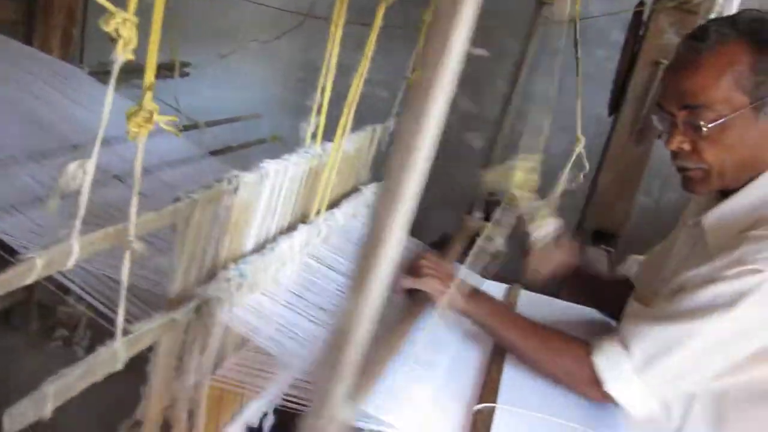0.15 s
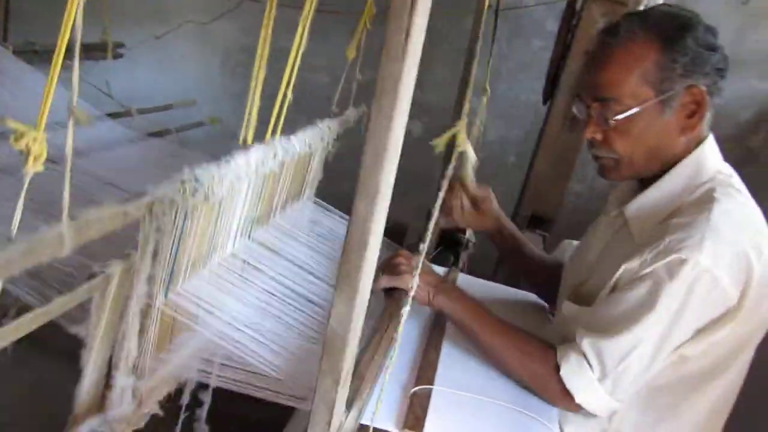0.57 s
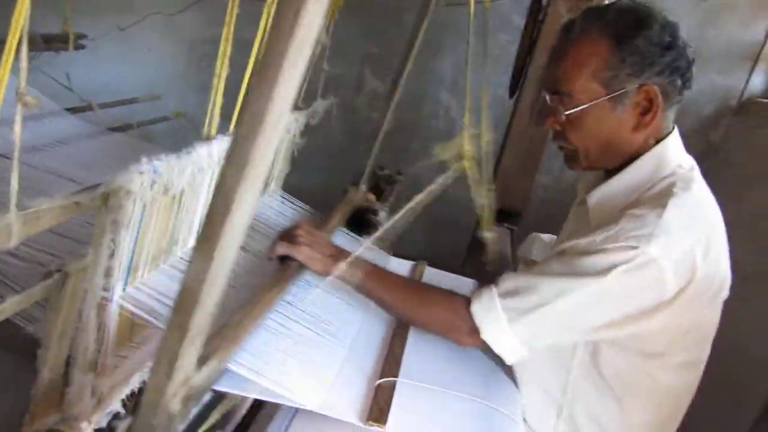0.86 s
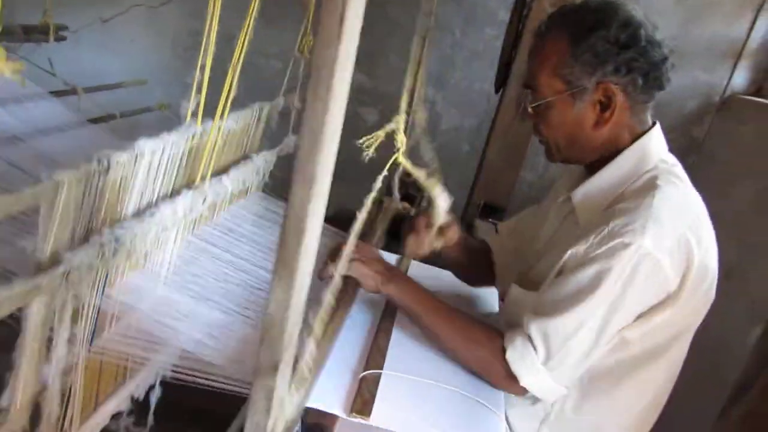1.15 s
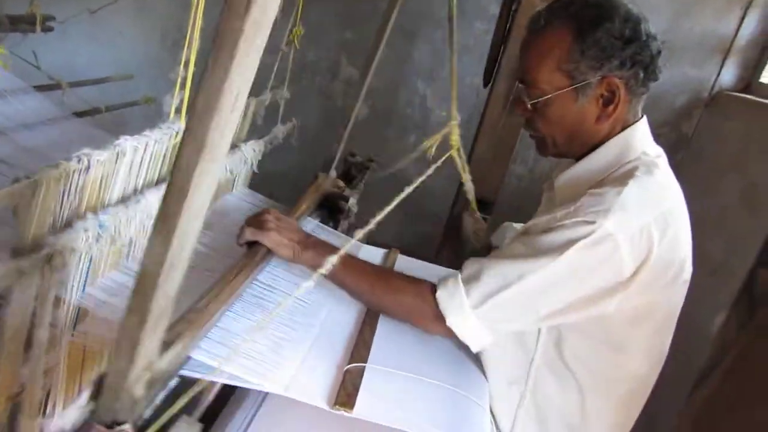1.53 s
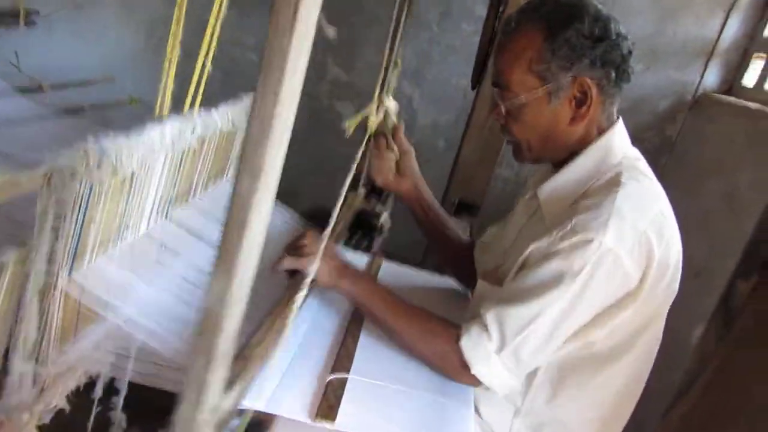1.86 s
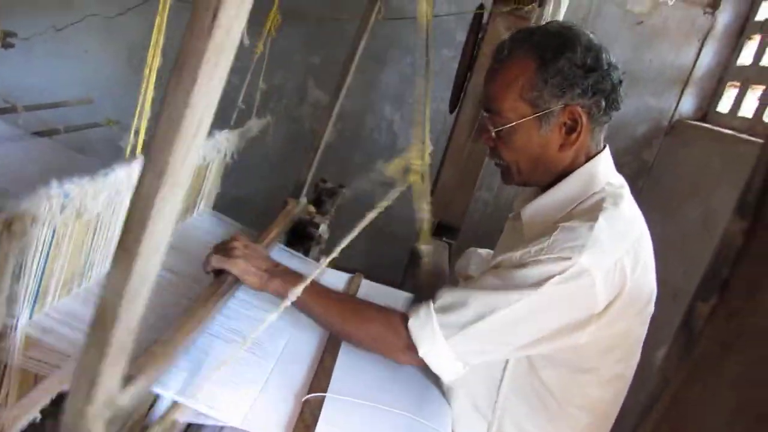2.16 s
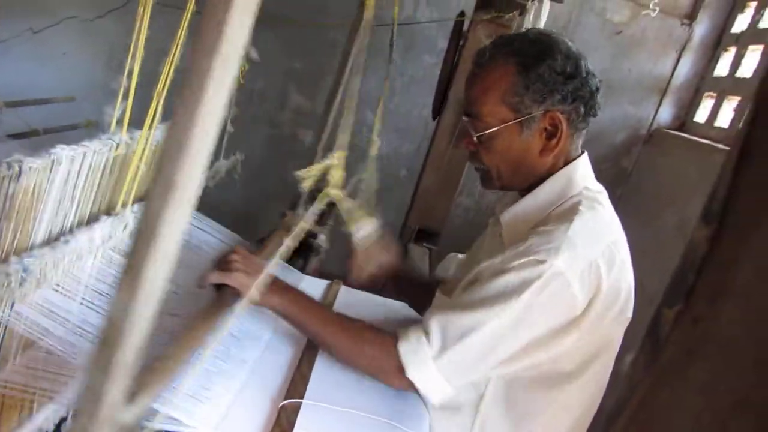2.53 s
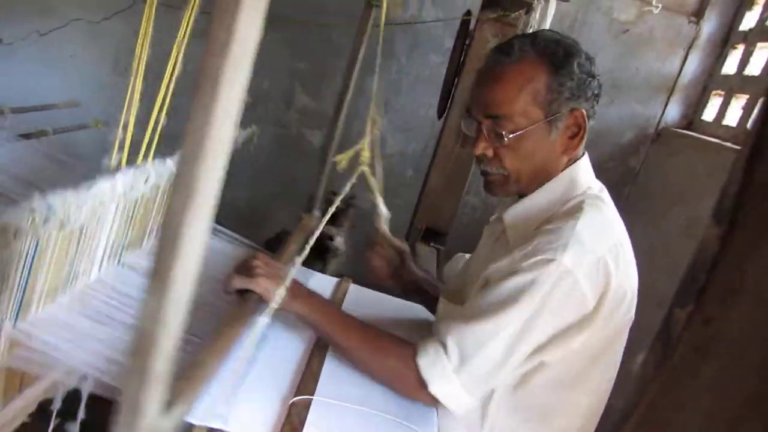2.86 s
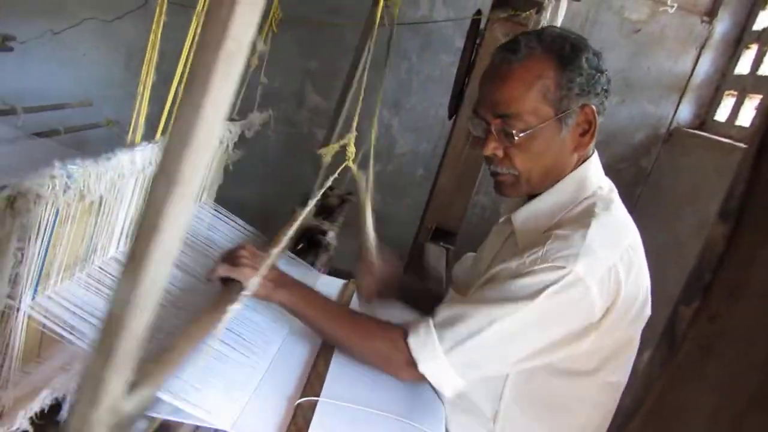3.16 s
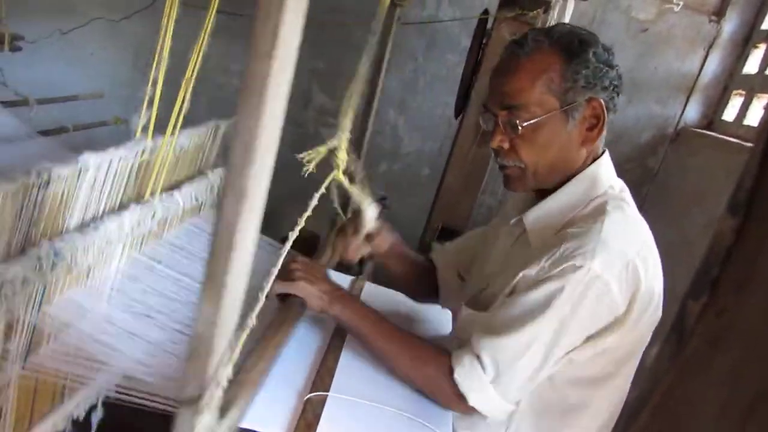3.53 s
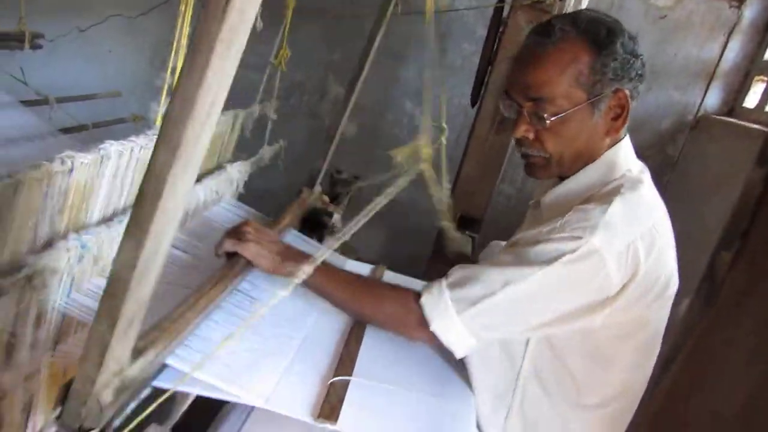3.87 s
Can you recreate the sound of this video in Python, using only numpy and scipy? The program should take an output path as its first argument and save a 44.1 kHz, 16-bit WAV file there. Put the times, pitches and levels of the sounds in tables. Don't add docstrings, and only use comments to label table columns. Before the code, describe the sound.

A wooden handloom about a metre away repeats a 1.2-second cycle: heavy beater slam, bright picker crack, rattling shafts and treadles, then a hollow shuttle knock, in a bare, reverberant workshop with faint fan hum.

```python
import sys
import numpy as np
from scipy import signal
from scipy.fft import rfft, irfft
from scipy.io import wavfile
from scipy.ndimage import uniform_filter1d

SR = 44100
rng = np.random.default_rng(int(sys.argv[2]) if len(sys.argv) > 2 else 0)


def volts(x):
    e = np.asarray(x, float) / 20
    return 10 ** e


def wav_out(sig):
    wavfile.write(sys.argv[1], SR, np.round(np.clip(np.atleast_2d(sig).T, -1, 1) * 32767).astype(np.int16))


N = 176400
LEAD_SAMPLES = 13230
SIZE = 24576

# start in seconds, peak level in dB, tilt in dB per octave, rattle in dB, beam in dB.
BEATER_BLOWS = [
    (0.233, -2, -2.44, -5.5),
    (1.418, -3, -2.6, -5),
    (2.613, -2.5, -2.4, -7),
    (3.798, -4, -1.5, 2),
]
PICKER_BLOWS = [
    (0.403, -4.5, 0, 0.0038, 2),
    (1.586, -2, 0.74, 0, -2),
    (2.785, -2.5, 0.95, 0, -2.5),
    (3.967, 0.5, 0.81, 0, -2),
]
SHUTTLE_LANDINGS = [
    (1.022, -1, 0.85, 0, -4.5),
    (2.214, -2, 0.36, 0, -4),
    (3.399, -3, 0, 0, 0),
]
EARLIER_LANDING = [
    (-0.12, -4, 0.026, 0.018),
]
# start in seconds, peak level in dB, tilt in dB per octave.
SHAFT_KNOCKS = [(0.77, -29, 2), (0.79, -16.5, -3.5), (0.794, -20.5, -3.5), (0.811, -14.5, 1),
                (0.816, -9, -1), (0.824, -16.5, 5), (0.843, -14.5, 6), (0.857, -12, -4.5),
                (0.865, -6, -0.5), (0.877, -16.5, -9), (0.905, -13, 5), (1.954, -24, 3.5),
                (1.978, -11.5, -2), (1.997, -13, 2), (2.003, -7.5, -1), (2.008, -13.5, 4.5),
                (2.016, -16.5, 6.5), (2.02, -17, 0), (2.045, -11, 1), (2.051, -7, 0), (2.064, -12, -3),
                (2.078, -16, -3), (2.089, -11, 8), (2.097, -13, 4), (3.148, -22.5, 0.5), (3.168, -13.5, -2),
                (3.189, -10.5, 0), (3.194, -8, 1), (3.201, -8.5, 3.5), (3.234, -11, 2), (3.243, -6, -1.5),
                (3.251, -16, -9), (3.279, -13, 6)]
# start in seconds, peak level in dB, tilt in dB per octave.
CORD_TICKS = [(0.0179, -28, 4.5), (0.1037, -24, 1.5), (0.109, -19, 1), (0.115, -34, -4), (0.1446, -48, 2),
              (0.1795, -38, 7), (0.3077, -28.5, 2.1), (0.6024, -27, -0.2), (1.19, -35, -7),
              (1.2012, -26.5, -0.5), (1.227, -27.5, -3.5), (1.257, -32, -4), (1.2645, -30.5, 0),
              (1.314, -44, 8), (2.3955, -26, -1.3), (2.4599, -26.5, -3), (2.5134, -32.5, 0.61),
              (2.55, -39, -9), (2.989, -31, 0.5), (3.5349, -22, -2), (3.5555, -24, -2), (3.5813, -27, -0.5),
              (3.6638, -20.5, 1.5), (3.6778, -30, -2), (3.742, -35, 5)]
# start in seconds, length in seconds, level in dB, tilt in dB per octave.
SCRAPES = [
    (0.811, 0.057, -33, 1),
    (0.893, 0.036, -36, 2.5),
    (1.994, 0.061, -28.5, 0),
    (2.08, 0.03, -29.5, 1.5),
    (3.19, 0.068, -30.5, -1.5),
    (3.268, 0.0284, -28, 1.5),
]
# start in seconds, peak level in dB, pitch in Hz.
FRAME_THUDS = [
    (0.238, -30, 194),
    (1.028, -40, 151),
    (1.409, -36, 208),
    (2.07, -23.5, 150.4),
    (2.148, -38, 148),
    (2.219, -46, 215),
    (2.62, -29, 196),
    (2.881, -28, 142),
    (3.2, -44, 248),
    (3.792, -30, 208),
]
# start in seconds, length in seconds, level in dB.
CORD_SQUEALS = [
    (.945, .08, -62),
    (3.31, .075, -62),
]

# delay in seconds, level in dB, decay in seconds.
BEATER_CONTACTS = [(-.013, -26, .003), (-.005, -18, .003), (-.002, -8, .0015), (0, -1, .0012),
                   (.002, -1, .0012), (.0058, 1, .0012), (.009, -11, .004)]
PICKER_CONTACTS = [(-.001, -4, .002), (.0015, 0, .0015), (.005, -3, .002), (.009, -8, .008)]
SHUTTLE_CONTACTS = [(-.0018, -7, .001), (.0008, 0, .001), (.003, -7, .003), (.007, -13, .006)]
SHAFT_CONTACTS = [(0, 0, .0008), (.002, -11, .003)]
TICK_CONTACTS = [(0, -3, .002), (.003, 0, .004)]

# frequency in Hz, width in Hz, level in dB.
BEATER_MODES_HZ_DB = [(840, 53, -1), (1660, 220, -20.5), (2150, 67, -17.5), (3060, 220, 5),
                      (5900, 660, -6.5)]
PICKER_MODES_HZ_DB = [(1227, 24, 9), (1817, 160, 3.5), (2940, 40, 3.5), (3440, 320, 0.5), (5320, 150, -4.5)]
SHUTTLE_MODES_HZ_DB = [(830, 160, -2), (1220, 23, -11.5), (1950, 480, -8), (2680, 180, -6),
                       (4630, 140, -23)]
SHAFT_MODES_HZ_DB = [(1050, 580, -9), (1700, 30, -12), (2010, 65, -11), (2685, 600, -13.5), (5130, 85, -35)]
# frequency in Hz, level in dB, T60 in seconds.
BEAM_PARTIALS = [(1225, -32, .7), (1850, -35, .45), (585, -43, .5)]

# frequency in Hz, level in dB.
BEATER_COLOUR_DB = [(60, -29), (200, -9.5), (1000, -6.5), (2810, 3.5), (4680, 3), (9210, -0.5),
                    (12000, -17.5), (16000, -6)]
PICKER_COLOUR_DB = [(47, -90), (100, -48), (700, -20.5), (1400, -4.5), (1900, -8.5), (2430, -5),
                    (5900, -2.5), (10000, -13), (16000, -30.5)]
SHUTTLE_COLOUR_DB = [(60, -16), (200, -20), (515, -16), (1170, -5.5), (2720, 3), (4050, -4.5), (7700, -6.5),
                     (12000, -24.5), (16000, -29)]
SHAFT_COLOUR_DB = [(47, -84), (100, -28), (361, -19), (700, -9), (1170, -6), (3170, -4.5), (4620, -9.5),
                   (6500, -9.5), (11000, -29.5), (16000, -46)]
TICK_COLOUR_DB = [(120, -66), (200, -25.5), (709, -3.5), (1400, -17), (2330, -5), (3760, -12),
                  (7540, -12.5), (16000, -58.5)]
RATTLE_COLOUR_DB = [(88, -32), (150, -22), (264, -17), (1240, -4), (2800, -9), (6260, -17), (11000, -40.5),
                    (16000, -47)]

# frequency in Hz, T60 in seconds.
ROOM_T60_S = [(300, 1), (1500, 0.73), (4000, 0.54), (9000, 0.43), (16000, 0.14)]
# frequency in Hz, correlation.
ROOM_CORRELATION = [(60, 0.45), (200, 0.99), (1000, 0.83), (3000, 0.17), (8000, 0.033)]
# frequency in Hz, level in dB.
MURMUR_COLOUR_DB = [(26, -36), (45, -10), (183, -4), (271, -3.5), (1210, -5.5), (3490, -16), (3750, -20),
                    (4040, -23), (16000, -45)]
# time in seconds, level in dB.
HUM_LEVEL_DB = [(0.0, -57.5), (0.18, -55), (4.0, -57)]
# frequency in Hz, left minus right in dB.
PORT_DIFFERENCE_DB = [(200, -1), (700, .2), (3000, -1), (9000, 2), (13000, 0)]


def on_log(table, hz):
    points = np.array(table, float)
    return np.interp(np.log(hz + 1), np.log(points[:, 0] + 1), points[:, 1])


def causal(db):
    c = irfft(db * np.log(10) / 20)
    n = len(c) // 2
    return np.exp(rfft(np.r_[c[0], 2 * c[1:n], c[n], np.zeros(n - 1)]))


def walk(rate_hz, n):
    k = int(SR / rate_hz)
    v = np.repeat(rng.standard_normal(n // k + 1), k)
    v = uniform_filter1d(uniform_filter1d(v, k), k)[:n]
    return v / v.std()


def tone(hz):
    return np.sin(2 * np.pi * np.cumsum(hz) / SR)


def add(out, start_s, x):
    i = int(start_s * SR) + LEAD_SAMPLES
    n = min(x.shape[1], out.shape[1] - i)
    out[:, i:i + n] += x[:, :n]


def grit(spread_db):
    own_share = 0.23
    common, *own = rng.standard_normal((3, SIZE))
    v = np.sqrt(1 - own_share) * common + np.sqrt(own_share) * np.array(own)
    v = v * volts(spread_db * np.minimum(rng.exponential(size=SIZE), 7))
    return v / np.sqrt(np.mean(v ** 2))


def body(push, colour, tilt_db, modes, ring_db, widen):
    lag_spread_s = 3e-5
    hz = np.fft.rfftfreq(SIZE, 1 / SR)
    ring = 0
    for mode_hz, width_hz, db in modes:
        level_shift_db, pitch_shift = rng.standard_normal(2)
        mode_hz = mode_hz * (1 + 0.032 * pitch_shift)
        ring = ring + volts(ring_db + db + level_shift_db) / (1 + 2j * (hz - mode_hz) / (width_hz * widen))
    lag_s = lag_spread_s * rng.standard_normal() * np.array([[1], [-1]])
    place = np.exp(1j * np.pi * hz * lag_s)
    broad = causal(on_log(colour, hz) + tilt_db * np.log2((hz + 50) / 2000))
    return irfft(rfft(push) * place * broad * (1 + ring))


def contact_push(contacts, t, knock_hz):
    env = sum(volts(db) * (t >= d) * np.exp(-np.abs(t - d) / decay_s) for d, db, decay_s in contacts)
    touch = np.clip(np.diff(env, prepend=0), 0, None) * np.sign(walk(900, SIZE))
    knock_t = np.arange(256) / SR
    pitch_hz = knock_hz * volts(rng.standard_normal())
    knock = np.exp(-knock_t / 0.0007) * np.sin(2 * np.pi * pitch_hz * knock_t)
    return 1.39 * env * grit(1.44) + volts(6) * np.convolve(touch, knock)[:SIZE]


def loose_parts(t, tilt_db, rattle_db, t60_s):
    env = volts(rattle_db - 60 * np.abs(t) / t60_s + 2.47 * walk(151.2, SIZE)) * np.clip(t / 0.0018, 0, 1)
    x = body(grit(3.0), RATTLE_COLOUR_DB, .5 * tilt_db, SHAFT_MODES_HZ_DB, 0.17, 2.7)
    return env * x / x.std()


def frame_beam(t, beam_db):
    out = 0
    for hz, db, t60_s in BEAM_PARTIALS:
        env = volts(db + beam_db + 3.5 * walk(34.3, SIZE) - 60 * t / t60_s)
        hz = hz * (1 + .015 * rng.standard_normal())
        out = out + env * np.sin(2 * np.pi * hz * t + 6 * rng.random())
    return out * np.clip(t / 0.004, 0, 1)


def blows(rows, contacts, colour, modes, ring_db, rattle_db, rattle_t60_s, beam_db, knock_hz):
    before_s = .02
    out, t = np.zeros((2, N + LEAD_SAMPLES)), np.arange(SIZE) / SR - before_s
    for start_s, db, tilt_db, *extra_db in rows:
        loose_db, sing_db = (*extra_db, 0, 0)[:2]
        hit = body(contact_push(contacts, t, knock_hz), colour, tilt_db, modes, ring_db, 1.4)
        x = hit / np.abs(hit).max() + loose_parts(t, tilt_db, rattle_db + loose_db, rattle_t60_s)
        if beam_db is not None:
            x = x + frame_beam(t, beam_db + sing_db)
        add(out, start_s - before_s, volts(db) * x)
    return out


def beater():
    return blows(BEATER_BLOWS, BEATER_CONTACTS, BEATER_COLOUR_DB, BEATER_MODES_HZ_DB, ring_db=2.7,
                 rattle_db=-18.5, rattle_t60_s=0.21, beam_db=-16, knock_hz=1700)


def picker():
    return blows(PICKER_BLOWS, PICKER_CONTACTS, PICKER_COLOUR_DB, PICKER_MODES_HZ_DB, ring_db=8.9,
                 rattle_db=-19.5, rattle_t60_s=0.51, beam_db=0.19, knock_hz=2110)


def shuttle():
    return blows([*EARLIER_LANDING, *SHUTTLE_LANDINGS], SHUTTLE_CONTACTS, SHUTTLE_COLOUR_DB,
                 SHUTTLE_MODES_HZ_DB, ring_db=5.1,
                 rattle_db=-28.5, rattle_t60_s=0.74, beam_db=0.25, knock_hz=1350)


def shafts():
    return blows(SHAFT_KNOCKS, SHAFT_CONTACTS, SHAFT_COLOUR_DB, SHAFT_MODES_HZ_DB, ring_db=10.5,
                 rattle_db=-14.0, rattle_t60_s=0.19, beam_db=-7, knock_hz=1280)


def ticks():
    return blows(CORD_TICKS, TICK_CONTACTS, TICK_COLOUR_DB, SHAFT_MODES_HZ_DB, ring_db=8.6,
                 rattle_db=-13.5, rattle_t60_s=0.12, beam_db=None, knock_hz=1540)


def slides():
    clicks_per_s, clicks_db = 450, 12
    out, t = np.zeros((2, N + LEAD_SAMPLES)), np.arange(SIZE) / SR
    knock_t = np.arange(128) / SR
    knock = np.exp(-knock_t / .0007) * np.sin(2 * np.pi * 1700 * knock_t)
    for start_s, length_s, db, tilt_db in SCRAPES:
        fade_db = -60 * np.clip(t - length_s, 0, None) / 0.25
        env = np.clip(t / 0.0032, 0, 1) * volts(fade_db + walk(178, SIZE))
        clicks = (rng.random(SIZE) < clicks_per_s / SR) * rng.standard_normal(SIZE)
        clicks = volts(clicks_db) * np.convolve(clicks, knock)[:SIZE]
        x = body(env * (grit(3.5) + clicks), SHAFT_COLOUR_DB, tilt_db, SHAFT_MODES_HZ_DB, 1.1, 0.3)
        add(out, start_s, volts(db) * x / np.sqrt(np.mean(x[:, :int(length_s * SR)] ** 2)))
    return out


def thuds():
    thud_db, t60_s, rise_s = -5, .1, .006
    out, t = np.zeros((2, N + LEAD_SAMPLES)), np.arange(SIZE) / SR
    for start_s, db, hz in FRAME_THUDS:
        env = volts(db + thud_db - 60 * t / t60_s + 2.9 * walk(51, SIZE)) * np.clip(t / rise_s, 0, 1)
        add(out, start_s, env * tone(hz * volts(0.53 * walk(41, SIZE))) * np.ones((2, 1)))
    return out


def squeals():
    pitch_hz, wander_hz, fade_s = 10550, 90, .012
    t = np.arange(N) / SR
    env = sum(volts(db) * np.clip(np.minimum(t - start_s, start_s + length_s - t) / fade_s, 0, 1)
              for start_s, length_s, db in CORD_SQUEALS)
    return env * volts(3.5 * walk(120, N)) * tone(pitch_hz + wander_hz * walk(150, N))


def pair(n, colour_db, likeness):
    mid, side = (rfft(rng.standard_normal(n)) * volts(colour_db) for _ in range(2))
    c = np.clip(likeness, 0, 1)
    mid, side = mid * np.sqrt((1 + c) / 2), side * np.sqrt((1 - c) / 2)
    return np.array([irfft(mid + side, n), irfft(mid - side, n)])


def room(x):
    room_db, onset_s = -11.5, 0.0015
    hz, t = np.fft.rfftfreq(SIZE, 1 / SR) + 1, np.arange(SIZE) / SR
    likeness = on_log(ROOM_CORRELATION, hz)
    tail = 0
    for band_hz in 90 * 2 ** np.arange(0, 8, .5):
        band_db = -20 * (np.log2(hz / band_hz) / 0.63) ** 2
        tail = tail + pair(SIZE, band_db, likeness) * volts(-60 * t / on_log(ROOM_T60_S, band_hz))
    tail = tail * np.clip(t / onset_s, 0, 1)
    tail = tail / np.sqrt(np.sum(tail ** 2) / 2)
    return volts(room_db) * signal.fftconvolve(x, tail, axes=1)[:, :x.shape[1]]


def murmur():
    hz = np.fft.rfftfreq(N, 1 / SR)
    x = pair(N, on_log(MURMUR_COLOUR_DB, hz), on_log(ROOM_CORRELATION, hz)) * volts(0.39 * walk(2.5, N))
    return volts(-48) * x / x.std()


def fan_hum():
    hum_hz, wander_hz, hum_db, flutter_db = 154, 1.5, 2, 1.5
    level_db = np.interp(np.arange(N) / SR, *np.array(HUM_LEVEL_DB).T)
    env = volts(level_db + hum_db + flutter_db * walk(26.77, N))
    return env * tone(hum_hz + wander_hz * walk(4.17, N))


def scene():
    loom = beater() + picker() + shuttle() + shafts() + ticks() + slides() + thuds()
    return (loom + room(loom))[:, LEAD_SAMPLES:] + squeals() + murmur() + fan_hum()


def roll_off(x):
    return signal.sosfilt(signal.butter(12, 16360, fs=SR, output="sos"), x)


def record(dry):
    low_cut_hz, top_hz, lead_s = 48, 15900, 6e-5
    hz = np.fft.rfftfreq(N, 1 / SR)
    half = np.array([[.5], [-.5]])
    band = hz ** 4 / (hz ** 4 + low_cut_hz ** 4) / (1 + (hz / top_hz) ** 90)
    ports = volts(half * on_log(PORT_DIFFERENCE_DB, hz)) * np.exp(1j * half * 2 * np.pi * hz * lead_s)
    x = irfft(rfft(dry) * band * ports, N)
    return roll_off(np.tanh(x))


dry = scene()
out = record(dry)
wav_out(out)
```